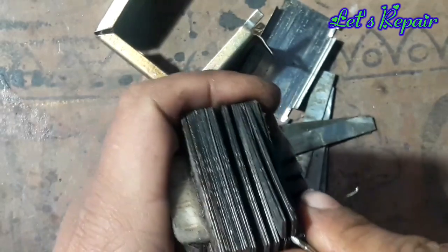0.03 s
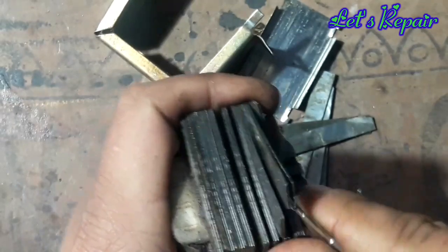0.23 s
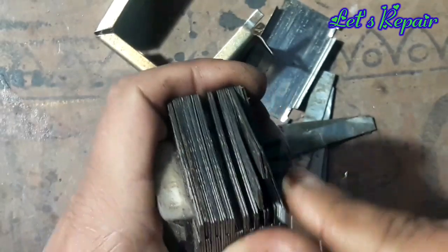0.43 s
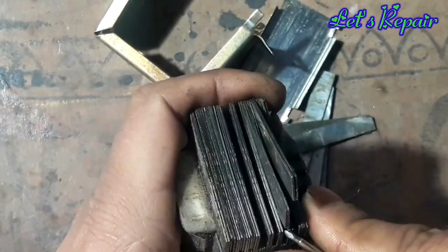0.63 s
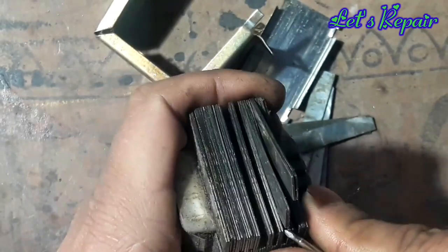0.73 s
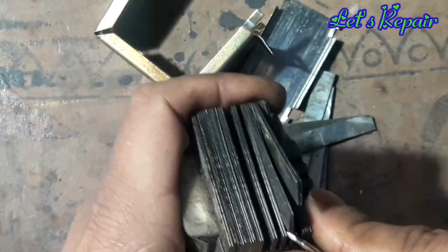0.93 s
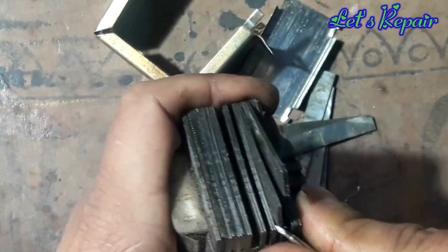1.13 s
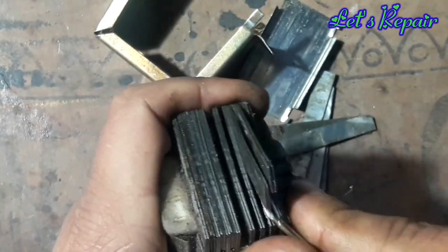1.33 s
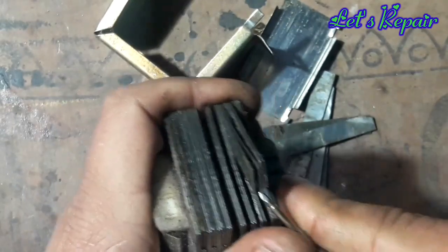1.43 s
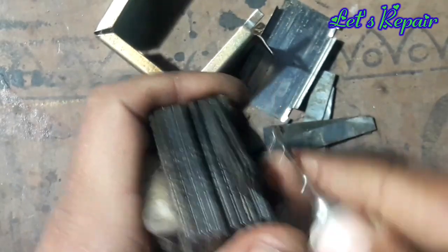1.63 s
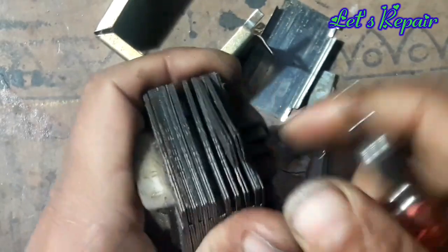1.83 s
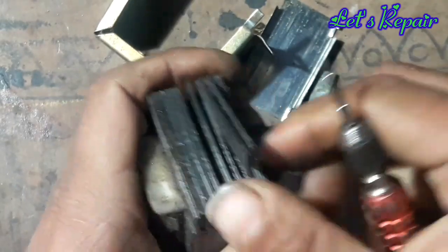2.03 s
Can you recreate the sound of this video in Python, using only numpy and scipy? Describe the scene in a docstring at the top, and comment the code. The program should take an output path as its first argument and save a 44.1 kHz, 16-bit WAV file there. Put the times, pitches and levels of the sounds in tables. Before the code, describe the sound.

Close up at a bench, dry metallic ticks come in uneven bursts, with faint scraping and finger rubbing between them, then a much louder snap; short room echo, very faint hum and hiss beneath.

```python
"""Thin steel laminations of a small transformer core, held in the hand, snap apart under a screwdriver.
Each snap is a flurry of tiny random contacts that rings the stack's resonances and the small hard room.
The blade slides up between two plates as resonant noise; fingers and blade rub the steel as soft hiss.
Beneath lie wavering sine lines of mains hum and a steady noise bed of rumble and hiss."""
import sys
import numpy as np
from scipy import signal
from scipy.fft import rfft, irfft
from scipy.io import wavfile

SR = 44100
rng = np.random.default_rng(int(sys.argv[2]) if len(sys.argv) > 2 else 0)


def int16_out(signal):
    """Quantize to a 16-bit WAV file."""
    q = np.round(np.clip(np.atleast_2d(signal).T, -1, 1) * 32767)
    wavfile.write(sys.argv[1], SR, q.astype(np.int16))


N = 91683  # length in samples


def amp(db):
    """Turn decibels into a linear factor."""
    return 10 ** (np.asarray(db) / 20)


def rms_one(x):
    """Scale a signal or shape to rms 1."""
    return x / np.sqrt(np.mean(x ** 2) + 1e-20)


def at_hz(points, hz):
    """Read a (frequency, level) curve along a logarithmic frequency axis."""
    curve = np.array(points)
    return np.interp(np.log(hz), np.log(curve[:, 0]), curve[:, 1])


def drift(rate_hz):
    """Slow random wander of rms 1: noise through two equal low-pass poles at rate_hz."""
    step = 40  # samples between the computed points
    pole = np.exp(-2 * np.pi * rate_hz * step / SR)
    settle = 2000  # points dropped while the filter settles
    noise = rng.standard_normal(N // step + settle + 2)
    slow = signal.lfilter([1], [1, -2 * pole, pole * pole], noise)[settle:]
    return np.interp(np.arange(N) / step, np.arange(len(slow)), rms_one(slow))


def ring(x, hz, width_hz):
    """A resonance passed twice, so that its flanks fall steeply; white input keeps its power."""
    radius = np.exp(-np.pi * width_hz / SR)
    angle = 2 * np.pi * hz / SR
    b = (1 - radius * radius) / 2 * np.array([1, 0, -1])
    a = [1, -2 * radius * np.cos(angle), radius * radius]
    once = signal.lfilter(b, a, x + 1e-18)
    return np.sqrt(SR / width_hz / 2) * signal.lfilter(b, a, once)


def coloured(spectrum):
    """Noise shaped by a relative spectrum, brought to a nominal rms of 1."""
    hz = np.maximum(np.arange(N // 2 + 1) * SR / N, 10)
    shape = rms_one(amp(at_hz(spectrum, hz)))
    return irfft(rfft(rng.standard_normal(N)) * shape, N)


# Plates snapping free: (time of the peak [s], level before SNAP_GAIN_DB [dB],
# then relative to it: knock [dB], low ring [dB], middle [dB], high ring [dB], treble [dB],
# rise [s], fall by 60 dB [s], room blow relative to the snap [dB])
SNAPS = [(.0386, -27.5, -33, -26.5, -17.5, -10.5, -22.5, 0.0016, 0.015, -18.5),
         (0.0415, -36, -28, -18, -16, -12.5, -20, 0.0019, 0.014, -41),
         (0.1963, -49, -36, -34, -23, -9, -22, .0012, 0.018, -24),
         (0.2052, -39, -46, -30.5, -23, -8.5, -27, .0012, 0.032, -16.5),
         (.2438, -41.5, -41, -39, -23, -13, -31, .0013, 0.019, -11),
         (0.2641, -25, -45, -33, -25.5, -9.5, -40, .0015, 0.01, -21.5),
         (0.2664, -39, -40, -17, -21, -6.5, -30, 0.0011, .012, -43),
         (0.3053, -26.5, -43, -23.5, -20, -8.5, -26, 0.00084, 0.017, -40),
         (.3084, -23, -49, -27.5, -18.5, -6, -22, 0.001, 0.0084, -16),
         (0.3097, -32, -43, -15, -17, -15.5, -23, 0.0012, 0.013, -45),
         (0.9199, -34, -47, -24, -17, -10, -20, 0.0025, 0.024, -19.5),
         (0.934, -48, -34, -9, -25, -5, -25, 0.0011, 0.011, -20),
         (1.462, -21.5, -36, -17.5, -10, -5, -15.5, 0.0012, 0.011, -21),
         (1.4643, -29, -32, -23, -19, -11.5, -27, 0.0011, 0.011, -39),
         (1.652, -6.5, -50.5, -38.5, -23.5, -11, -25, 0.00056, 0.022, -19.5),
         (1.6776, -33.5, -43, -32, -26, -7, -24, 0.00096, .007, -28),
         (1.7265, -28.5, -49, -18.5, -16, -10, -21, 0.0009, 0.019, -24)]
# Broad resonances of the hand-damped stack: (frequency [Hz], width of one pass [Hz], relative level [dB])
STACK = [(847, 680, -3), (1360, 1350, -1), (2126, 610, -9.5), (2466, 275, -2), (2820, 350, -14.5),
         (3860, 810, -5), (4406, 390, -4.5), (4870, 1040, -3.5), (5530, 610, -10), (6490, 610, -6.5),
         (7165, 780, -9.5), (8440, 3500, -7.5), (10620, 1450, -10), (12600, 4100, -6), (14960, 2400, -5.5)]
# Borders between the five level columns of a snap: (frequency [Hz])
ZONE_EDGES_HZ = [1600, 3300, 5300, 8000]
CONTACTS_PER_S, CONTACT_SPREAD_DB = 8000, 2  # within a snap
SNAP_GAIN_DB, THIN_HZ = 4.5, 463  # level of all snaps, high-pass corner


def snaps():
    """Swelling and dying flurries of contacts ring the stack; the room hears each as one blow."""
    t = np.arange(N) / SR
    hit = rng.random(N) < CONTACTS_PER_S / SR
    polarity = rng.choice([-1, 1], N)
    extra_db = CONTACT_SPREAD_DB * np.minimum(rng.exponential(1, N), 3)
    contacts = rms_one(hit * polarity * amp(extra_db))
    # one drive for each zone: [0] flurries heard directly, [1] single blows for the room
    force = np.zeros((2, 5, N))
    for s, peak_db, *zones_db, rise, fall, room_db in SNAPS:
        swell = np.clip(1 + (t - s) / max(rise, 1e-4), 0, 1) ** 2
        decay = amp(-60 * np.maximum(t - s, 0) / max(fall, 1e-3))
        shape = swell * decay
        levels = amp(peak_db + np.array(zones_db))
        force[0] += levels[:, None] * shape * contacts
        # the blow gathers the flurry's energy into one sample
        force[1, :, int(s * SR)] += levels * amp(room_db) * np.sqrt(np.sum(shape ** 2))
    out = 0
    for k, (hz, width, db) in enumerate(STACK):
        drive = force[:, np.searchsorted(ZONE_EDGES_HZ, hz)]
        # neighbouring resonances alternate in polarity
        out = out + (-1) ** k * amp(db + SNAP_GAIN_DB) * ring(drive, hz, width)
    return signal.sosfilt(signal.butter(2, THIN_HZ, "high", fs=SR, output="sos"), out)


# Reverberation of the small hard room: (frequency [Hz], decay by 60 dB [s], relative level [dB])
ROOM = [(1010, 0.37, 7.5), (2450, 0.37, 10), (3200, 0.36, 11.5), (4540, 0.41, 1.5), (6900, 0.35, 0.5),
        (10200, 0.29, 9), (14600, 0.28, 6)]
ROOM_GAP_S = 0.0066  # silence before the first reflection


def room(x):
    """Dense reflections as a noise tail that dies band by band."""
    t = np.arange(SR // 2) / SR
    edges = np.geomspace(500, 17000, 15)
    white = rng.standard_normal((2, len(t)))
    hz, t60, db = np.transpose(ROOM)
    tail = 0
    for k, (low, high) in enumerate(zip(edges, edges[1:])):
        # neighbouring bands use different noise
        band = signal.sosfilt(signal.butter(2, [low, high], "band", fs=SR, output="sos"), white[k % 2])
        centre = np.sqrt(low * high)
        decay_db = -60 * t / np.interp(centre, hz, t60)
        tail = tail + band * amp(np.interp(centre, hz, db) + decay_db)
    response = tail * (t > ROOM_GAP_S) / np.sqrt(SR / 400)
    return signal.fftconvolve(x, response)[:N]


# The blade sliding up between two plates: (time [s], level [dB], centre of the hollow tone [Hz])
SLIDE = [(1.12, -99, 950), (1.2, -70.5, 1050), (1.27, -66.5, 1080), (1.32, -62, 1160), (1.38, -63, 1520),
         (1.44, -73, 1530), (1.499, -67, 1310), (1.58, -95, 1300)]
SLIDE_SPAN_OCTAVES, SLIDE_RING_HZ, SLIDE_RING_DB = 0.69, 2440, -7.5


def slide():
    """Friction noise in the gap: fixed resonances fade over as the hollow tone climbs, then sinks a little."""
    s, db, centre_hz = np.transpose(SLIDE)
    t = np.arange(N) / SR
    centre = np.interp(t, s, centre_hz)
    hollow = 0
    for hz in np.geomspace(780, 1530, num=5):
        nearness = np.exp(-(np.log2(hz / centre) / SLIDE_SPAN_OCTAVES) ** 2)
        hollow = hollow + nearness * ring(rng.standard_normal(N), hz, 0.14 * hz)
    plate = amp(SLIDE_RING_DB) * ring(rng.standard_normal(N), SLIDE_RING_HZ, 380)
    level_db = np.interp(t, s, db, -140, -140) + 1.7 * drift(25)
    return amp(level_db) * (rms_one(hollow) + plate)


# Fingers and blade rubbing on steel: (time [s], level [dB])
RUB = [(0, -57.5), (.03, -63), (.13, -68), (.42, -70), (.56, -62.5), (.64, -66.5), (.72, -72.5), (.9, -72),
       (1.02, -70), (1.13, -72.5), (1.25, -65), (1.3, -59), (1.38, -63.5), (1.45, -64.5), (1.62, -69),
       (1.78, -60.5), (1.87, -60.5), (2.0, -56), (2.08, -61.5)]
# Colour of the rubbing: (frequency [Hz], relative level per Hz [dB])
RUB_COLOUR = [(1060, -19), (1800, -11.5), (2260, -11), (2720, -12), (3610, -2.5), (5390, -3.5),
              (6710, -0.5), (7420, -2.5), (8360, -22), (9330, -24), (12600, -19), (15300, -22),
              (16000, -12)]


def rubbing():
    """A soft grainy hiss of coloured noise that swells as the hands shift."""
    s, db = np.transpose(RUB)
    level_db = np.interp(np.arange(N) / SR, s, db) + 1.1 * drift(18)
    return amp(level_db) * coloured(RUB_COLOUR)


# Mains hum lines: (frequency [Hz], middle rms level [dB], rms waver, either sign [dB])
HUM = [(98, -73.5, -3), (197.8, -72.5, 0.5), (146.5, -74.5, -5.2)]


def hum():
    """Mains lines as sines that waver in level."""
    t = np.arange(N) / SR
    out = 0
    for hz, db, waver in HUM:
        level = np.sqrt(2) * amp(db + waver * drift(3.2))  # rms to peak
        out = out + level * np.sin(2 * np.pi * (hz * t + rng.random()))
    return out


# Colour of the room rumble and hiss: (frequency [Hz], relative level per Hz [dB])
AIR = [(21, -25), (35, -2), (123, 0), (171, -14), (205, -6.5), (351, -16.5), (543, -21.5), (617, -23.5),
       (1000, -21.5), (1860, -24.5), (2010, -23.5), (2220, -32), (5180, -39), (5590, -42), (7230, -35.5),
       (8650, -38.5), (16000, -30.5)]
# Tilt from the mid colour to the side colour, before levelling: (frequency [Hz], added level [dB])
AIR_SIDE = [(60, -39), (110, -20), (200, -13.5), (380, -13.5), (700, -7), (1290, -11), (2380, -5),
            (4400, 17), (8120, -2.5), (15000, 3)]
AIR_DB = -64.5  # rms level of the mid


def air():
    """Steady rumble and hiss: independent coloured noises for mid and side."""
    side_colour = [(hz, db + at_hz(AIR_SIDE, hz)) for hz, db in AIR]
    mid = amp(AIR_DB) * coloured(AIR)
    side = amp(AIR_DB - 8.5) * coloured(side_colour)
    return np.array([mid, side])


def scene():
    """Every source sits in the middle; only the air has width."""
    direct, send = snaps()
    mid, side = air()
    mid = mid + direct + room(send) + slide() + rubbing() + hum()
    return np.array([mid + side, mid - side])


CUTOFF_HZ = 16800


def record(dry):
    """Weak deep bass, a step down in the top octave's end, then a steep cut."""
    thin = signal.sosfilt(signal.butter(8, 39, "high", fs=SR, output="sos"), dry)
    dull = signal.sosfilt(signal.cheby2(12, 24, 15800, fs=SR, output="sos"), thin)
    return signal.sosfilt(signal.cheby2(14, 50, CUTOFF_HZ, fs=SR, output="sos"), dull)


dry = scene()
out = record(dry)
int16_out(out)
```